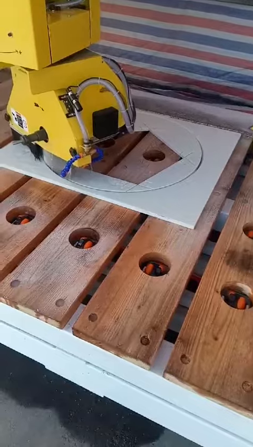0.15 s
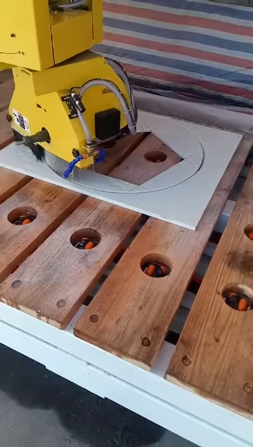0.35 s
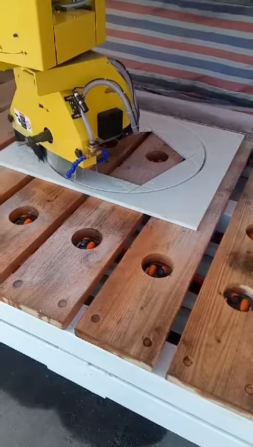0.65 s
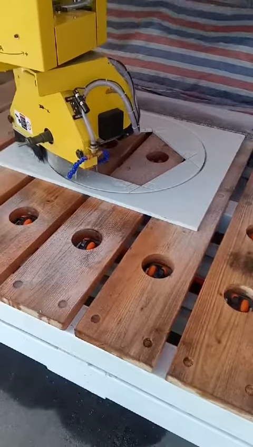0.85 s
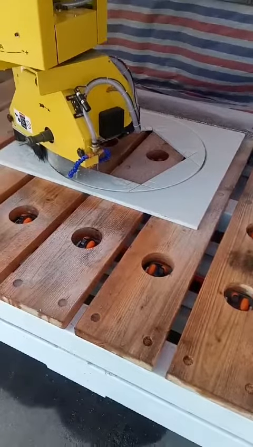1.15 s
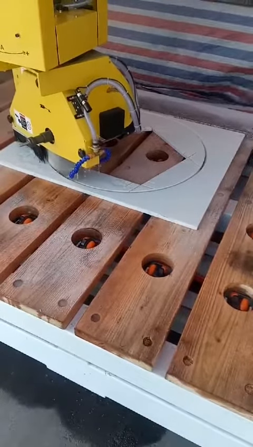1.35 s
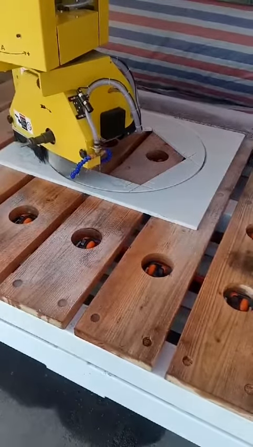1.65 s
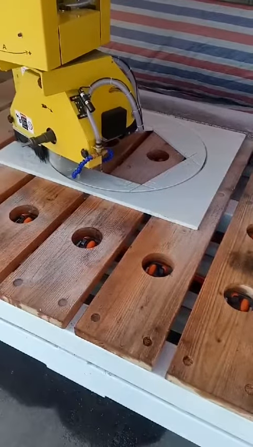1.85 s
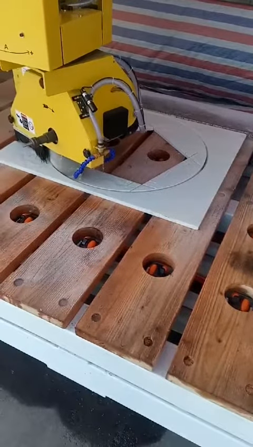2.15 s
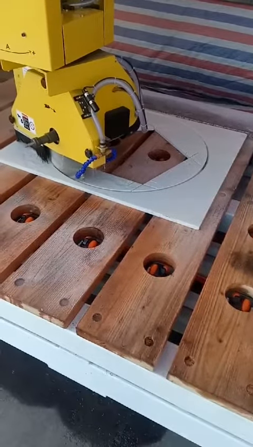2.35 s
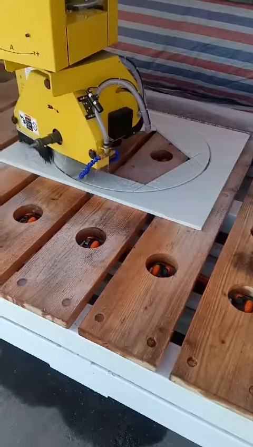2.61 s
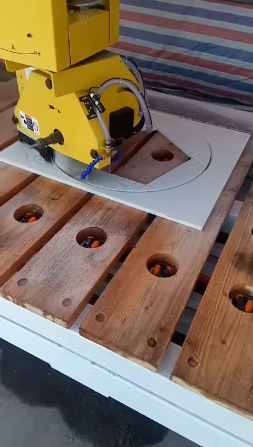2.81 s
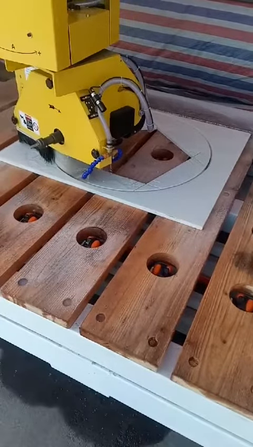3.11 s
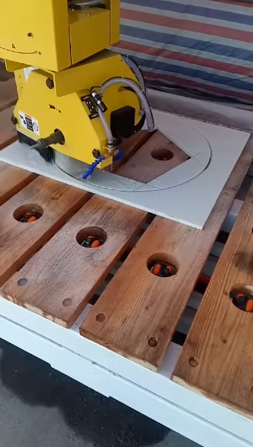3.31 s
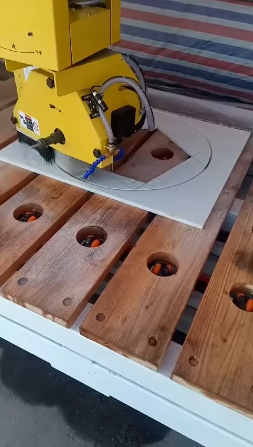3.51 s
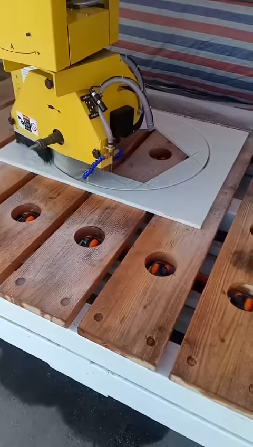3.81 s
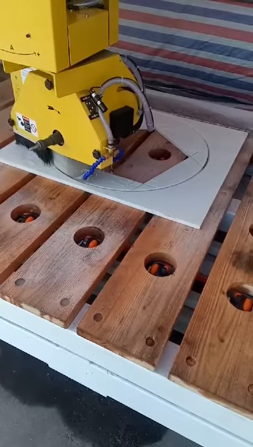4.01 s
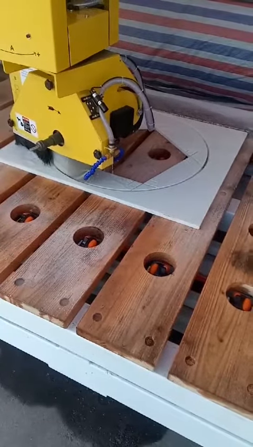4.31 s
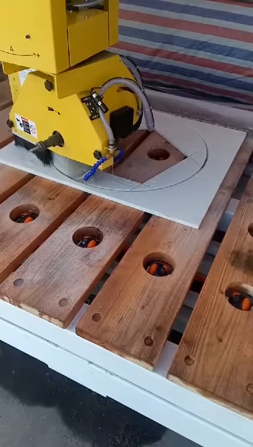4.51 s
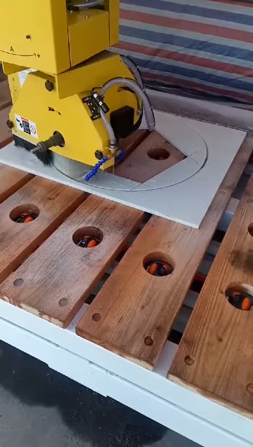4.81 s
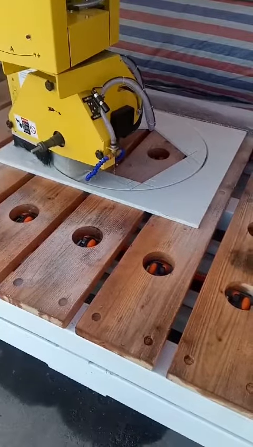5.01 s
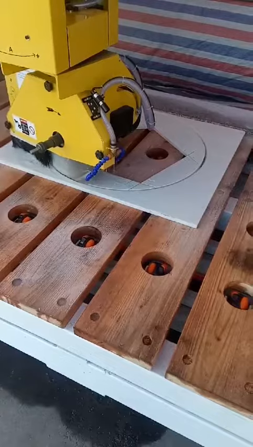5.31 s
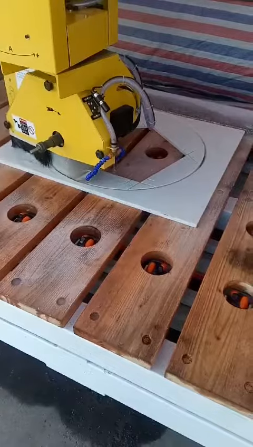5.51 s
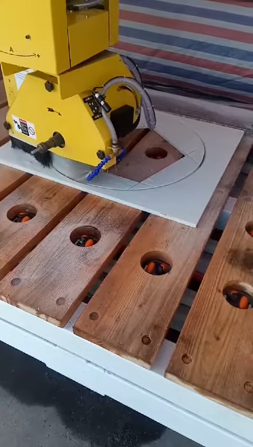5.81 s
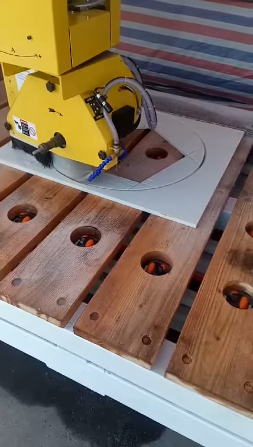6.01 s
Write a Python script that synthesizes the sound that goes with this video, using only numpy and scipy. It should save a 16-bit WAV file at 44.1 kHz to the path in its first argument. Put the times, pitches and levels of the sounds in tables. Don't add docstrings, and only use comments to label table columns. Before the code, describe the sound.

For about six seconds a water-cooled diamond blade cuts stone, starting at full force and never changing speed. The sound is a loud, dense, metallic whine, strongest at roughly two to four and a half kilohertz, made of many steady tones that beat together with a fast buzz of about fifty pulses a second. Loose grit makes the steel disc ring roughly, with a broad grinding hiss. From 0 to 2 s several piercing tones share the front; around 3 to 4 s a ringing tone near two kilohertz swells. A high squeal near 4.6 s is followed by stronger whining around 5 to 6 s. Airy water spray grows slightly throughout. Low motor hum and yard rumble sit far beneath, with small bed shudders, strongest near 3.3 s. Close phone microphone, dry, peaks squashed, treble slightly blurred; it ends still cutting.

```python
import sys
import numpy as np
from scipy import signal
from scipy.fft import rfft, irfft, next_fast_len
from scipy.io import wavfile
from scipy.ndimage import uniform_filter1d, minimum_filter1d, map_coordinates

SR = 44100
rng = np.random.default_rng(int(sys.argv[2]) if len(sys.argv) > 2 else 0)


def linear_from_db(decibels):
    return 10 ** (np.asarray(decibels, float) / 20)


def transcribe(u):
    v = np.clip(np.atleast_2d(u).T, -1, 1)
    q = np.round(v * 32767).astype(np.int16)
    wavfile.write(sys.argv[1], SR, q)


N = 271345
TOP_MULTIPLE = 312

# time in seconds, speed in Hz (turns per second).
SHAFT = [(0, 49.553), (6.15, 49.553)]
SWING_S = [.8, 3.1, 5.4]


def unit(x):
    return x / np.sqrt(np.mean(np.abs(x) ** 2) + 1e-20)


def along(points, hz):
    f, value = np.transpose(points)
    return np.interp(np.log(hz + 1), np.log(f + 1), value)


def curves(rows, t):
    s, *columns = np.transpose(rows)
    return [np.interp(t, s, column) for column in columns]


def wobble(knots_per_s):
    return map_coordinates(rng.standard_normal(400), [np.arange(N) * knots_per_s / SR])


def filtered(x, response):
    size = next_fast_len(N + 8192)
    spectrum = rfft(x, size) * response(np.fft.rfftfreq(size, 1 / SR))
    return irfft(spectrum, size)[..., :N]


def noise(spectrum):
    return unit(filtered(rng.standard_normal(N), lambda f: linear_from_db(along(spectrum, f))))


def drift(count, turns):
    z = rng.standard_normal((2, count, TOP_MULTIPLE))
    for _ in range(2):
        z = uniform_filter1d(z, max(round(turns), 1), axis=1)
    return unit(z[0] + 1j * z[1])


def bite(angle):
    # frequency in Hz, level in dB each.
    comb = [(50, -52), (1500, -48), (2500, -43), (4500, -42), (5500, -47.5), (6600, -46), (7600, -49.5),
            (8600, -55), (11000, -60), (12500, -67), (15000, -72)]
    # shaft multiple, level in dB facing, halfway, swung away.
    hum = [(1, -63.9, -55.9, -50.9), (2, -57.9, -55.9, -51.9), (3, -47.9, -48.9, -51.9),
           (4, -47.9, -48.9, -48.9), (5, -49.9, -47.9, -48.9), (6, -38.9, -35.9, -34.9),
           (7, -44.9, -37.9, -39.9), (8, -28.9, -28.9, -28.9), (9, -38.9, -37.9, -40.9),
           (10, -39.9, -42.9, -40.9), (11, -30.9, -36.9, -43.9), (12, -43.9, -42.9, -44.9),
           (13, -42.9, -45.9, -52.9), (14, -39.9, -44.9, -45.9), (15, -40.9, -37.9, -40.9),
           (16, -38.9, -40.9, -48.9), (17, -45.9, -48.9, -46.9), (18, -39.9, -37.9, -38.9),
           (19, -46.9, -45.9, -43.9), (20, -35.9, -33.9, -32.9), (21, -36.9, -40.9, -43.9),
           (22, -33.9, -33.9, -32.9), (23, -45.9, -42.9, -53.9), (24, -45.9, -43.9, -40.9),
           (25, -33.9, -35.9, -36.9), (26, -42.9, -36.9, -32.9), (27, -39.9, -37.9, -34.9),
           (28, -31.9, -35.9, -41.9), (29, -35.9, -39.9, -38.9), (30, -37.9, -44.9, -49.9)]
    # shaft multiple, level in dB facing,
    # halfway, swung away.
    disc_tones = [(32, -30.9, -32.9, -32.9), (33, -45.9, -39.9, -31.9), (34, -43.9, -40.9, -38.9),
                  (35, -25.9, -24.9, -24.9), (36, -32.9, -35.9, -33.9), (37, -25.9, -29.9, -39.9),
                  (40, -34.9, -36.9, -30.9), (41, -27.9, -26.9, -21.9), (42, -26.9, -29.9, -33.9),
                  (43, -23.9, -29.9, -31.9), (44, -30.9, -29.9, -31.9), (45, -32.9, -29.9, -32.9),
                  (46, -33.9, -33.9, -38.9), (47, -34.9, -31.9, -31.9), (48, -30.9, -28.9, -26.9),
                  (49, -37.9, -42.9, -39.9), (50, -30.9, -29.9, -30.9), (51, -40.9, -38.9, -39.9),
                  (52, -43.9, -35.9, -34.9), (53, -21.9, -22.9, -21.9), (54, -23.9, -29.9, -35.9),
                  (55, -21.9, -26.9, -30.9), (56, -32.9, -27.9, -28.9), (57, -36.9, -29.9, -30.9),
                  (58, -37.9, -32.9, -32.9), (59, -35.9, -32.9, -28.9), (60, -22.9, -31.9, -32.9),
                  (61, -29.9, -25.9, -23.9), (62, -21.9, -25.9, -30.9), (63, -36.9, -38.9, -32.9),
                  (64, -35.9, -40.9, -31.9), (65, -38.9, -32.9, -33.9), (66, -27.9, -25.9, -29.9),
             (67, -25.9, -28.9, -27.9), (68, -22.9, -25.9, -23.9), (69, -30.9, -27.9, -32.9),
             (70, -29.9, -34.9, -32.9), (71, -29.9, -33.9, -32.9), (72, -28.9, -30.9, -36.9),
             (73, -29.9, -36.9, -29.9), (74, -28.9, -32.9, -30.9), (76, -25.9, -26.9, -31.9),
             (77, -27.9, -30.9, -29.9), (78, -22.9, -26.9, -30.9), (79, -32.9, -25.9, -23.9),
             (80, -33.9, -29.9, -29.9), (81, -34.9, -37.9, -36.9), (82, -41.9, -34.9, -38.9),
             (83, -25.9, -28.9, -28.9), (85, -25.9, -23.9, -23.9), (86, -24.9, -25.9, -27.9),
             (87, -29.9, -29.9, -27.9), (88, -32.9, -34.9, -31.9), (89, -32.9, -42.9, -36.9),
             (90, -35.9, -36.9, -33.9), (91, -35.9, -40.9, -38.9), (92, -31.9, -37.9, -39.9),
             (93, -31.9, -27.9, -31.9), (94, -36.9, -34.9, -38.9), (96, -35.9, -35.9, -29.9),
                  (99, -34, -33, -36), (100, -38, -32, -40), (110, -36, -43, -43), (117, -43, -39, -42),
            (120, -38, -37, -47), (123, -39, -39, -38), (127, -41, -40, -42), (128, -39, -41, -40),
            (129, -42, -41, -38), (130, -38, -33, -37), (131, -40, -43, -44), (132, -38, -36, -37),
            (133, -37, -41, -40), (134, -44, -37, -38), (135, -41, -40, -35), (136, -38, -39, -42),
            (144, -38, -42, -48), (146, -43, -47, -49), (147, -43, -44, -51), (149, -42, -46, -44),
            (151, -43, -47, -49), (159, -46, -46, -45), (160, -51, -43, -43), (161, -55, -52, -42),
            (184, -51, -48, -56), (202, -57, -52, -50), (203, -52, -49, -54), (204, -49, -52, -58),
            (209, -57, -51, -53), (217, -55, -50, -53)]
    # time in seconds, half length in seconds, multiple, extra dB.
    squeals = [
        (4.58, .25, 96, 9),
        (5.7, .25, 86, 4),
        (5.7, .25, 87, 4),
        (.6, .6, 54, -2.5),
        (.5, .5, 55, -2),
        (5.6, .3, 96, -5),
        (4.3, .5, 53, -6),
        (5.65, .4, 53, 2),
        (5.7, .35, 33, 4),
        (3.2, .4, 130, 2),
    ]
    # shaft multiple, time on axis
    # in seconds, level on axis in dB, fall-off in dB per s^2.
    beams = [(38, 3.6, -18.5, 1.4), (39, .8, -23, 3), (39, 3.5, -16, 2), (39, 5.35, -12, 12),
             (75, .5, -22, 8), (75, 3.1, -20.5, 2.5), (75, 5, -15, 8), (75, 6, -16, 20), (84, .25, -26, 30),
             (84, 2.3, -21, 10), (84, 3.9, -18.5, 3), (84, 5.8, -18, 10)]

    count = int(angle[-1]) + 3
    seconds = np.interp(np.arange(count), angle, np.arange(N) / SR)
    multiple = np.arange(1, TOP_MULTIPLE + 1)
    weak_db = along(comb, multiple * SHAFT[0][1]) + 3 * rng.standard_normal(TOP_MULTIPLE)
    db = np.tile(weak_db, (count, 1))
    for k, *swing_db in hum + disc_tones:
        db[:, int(k) - 1] = np.interp(seconds, SWING_S, swing_db)
    for s, half_s, k, extra_db in squeals:
        db[:, k - 1] += extra_db * np.exp(-((seconds - s) / half_s) ** 2)

    loose = np.clip(.14 + .17 * np.log(multiple / 12), .1, .95)
    slow = drift(count, turns=25)
    quick = drift(count, turns=5)
    for k in {int(beam[0]) for beam in beams}:
        power = 0
        for j, s, axis_db, fall_db in beams:
            if int(j) == k:
                power = power + linear_from_db(2 * (axis_db - fall_db * (seconds - s) ** 2))
        db[:, k - 1] = 10 * np.log10(power + 1e-12)
        loose[k - 1] = .1
    shape = np.sqrt(1 - loose ** 2) + loose * slow + .2 * quick

    arbor = 1 + .12 * np.sin(2 * np.pi * 12.4 * seconds) + .1 * np.sin(2 * np.pi * 7.6 * seconds)
    shape = shape * arbor[:, None]
    scatter_rad = np.interp(multiple, [12, 16, 33, 36, 44, 52], [1.0, 2.2, 2.2, .7, .7, 4])
    lines = linear_from_db(db) * shape * np.exp(1j * scatter_rad * rng.standard_normal(TOP_MULTIPLE))

    points = 4096
    padded = np.pad(lines, ((0, 0), (1, points // 2 - TOP_MULTIPLE)))
    turns = irfft(padded, points) * points / np.sqrt(2)
    turns = np.hstack([turns, turns[:, :1]])
    return map_coordinates(turns, [angle, angle % 1 * points], order=1)


def grit(angle):
    # frequency in Hz, width in Hz, level in dB facing, level in dB swung away.
    modes = [(1700, 120, -16, -14), (1950, 70, -7, -7), (2100, 100, -12, -9), (2400, 100, -17, -14),
             (2650, 70, -8, -8), (2950, 50, -8, -12), (3050, 50, -4, -11), (3300, 70, -4, -3.5),
             (3700, 80, -1, 1), (3850, 80, -10, -4), (4200, 110, -3, -5), (4450, 70, -9, -12),
             (4620, 100, -8, -10), (4900, 80, -13, -16), (5100, 90, -17, -17), (5430, 90, -17, -19),
             (6050, 100, -17, -19), (6500, 300, -15, -15.5), (6700, 70, -15, -17), (7100, 120, -20, -23),
             (7500, 90, -16, -18), (8500, 200, -24, -24), (10100, 500, -25, -25)]
    # frequency in Hz, level in dB per Hz.
    grind = [(100, -33), (300, -24), (650, -25), (900, -21), (1500, -20), (2400, -19), (3900, -12),
             (5600, -26), (7000, -21.5), (8000, -25), (9500, -30), (12000, -38), (16000, -50)]

    runout = unit(linear_from_db(1.5 * np.cos(2 * np.pi * angle) + 1.1 * np.cos(4 * np.pi * angle + 1.3)))
    blows = runout * rng.standard_normal(N)
    hz = np.arange(0, SR / 2, 4.)

    def rung(level_column):
        power = 0
        for mode in modes:
            peak = 1 / (1 + (2 * (hz - mode[0]) / mode[1]) ** 2) ** 1.4
            power = power + linear_from_db(2 * mode[level_column]) * peak
        return filtered(blows, lambda f: np.interp(f, hz, np.sqrt(power)))

    away = np.interp(np.arange(N) / SR, SWING_S, [0, .5, 1])
    ring = (1 - away) * rung(2) + away * rung(3)
    hiss = filtered(rng.standard_normal(N), lambda f: linear_from_db(along(grind, f)))
    return linear_from_db(3.2 + 1.3 * wobble(13)) * ring + linear_from_db(.5 * wobble(3)) * hiss


def spray(angle):
    # frequency in Hz, level in dB per Hz.
    water = [(5000, -35), (8000, -5), (9000, -1), (10300, 0), (11500, -3.5), (13000, -8), (15400, -7),
             (15600, -40)]
    start_db, growth_db_per_s = -37.5, .35
    gusts = linear_from_db(1.5 * wobble(14) + 1.2 * wobble(40) + 1.2 * np.cos(2 * np.pi * angle))
    level_db = start_db + growth_db_per_s * np.arange(N) / SR
    return linear_from_db(level_db) * unit(gusts * noise(water))


def rumble():
    # frequency in Hz, level in dB per Hz.
    yard = [(15, -34), (35, -19), (50, -5), (80, -6), (150, -5), (215, 5), (300, -10), (600, -40)]
    # time in seconds, level in dB over calm.
    shudders = [
        (.55, 7),
        (1.17, 9),
        (2.38, 6),
        (2.9, 10),
        (3.27, 13),
        (4.4, 9),
        (4.64, 9),
        (5.05, 6),
        (5.58, 7),
        (5.86, 8),
    ]
    calm_db, calm_db_per_s, shudder_s = -55, 1.1, .07
    pump_hz, pump_width_hz, pump_db = 218, 8, -48

    t = np.arange(N) / SR
    bed_db = calm_db + calm_db_per_s * t
    for s, db in shudders:
        bed_db = bed_db + db * np.exp(-((t - s) / shudder_s) ** 2)
    bed = linear_from_db(bed_db + 2.6 * wobble(5)) * noise(yard)
    pump = filtered(rng.standard_normal(N), lambda f: 1 / (1 + (2 * (f - pump_hz) / pump_width_hz) ** 2))
    return bed + linear_from_db(pump_db) * unit(pump)


def scene():
    angle = np.cumsum(curves(SHAFT, np.arange(N) / SR)[0]) / SR
    saw = linear_from_db(1.7) * bite(angle) + grit(angle) + spray(angle) + rumble()
    return np.array([saw, saw])


def scramble_treble(x):
    # time in seconds, share 0-1.
    share_by_time = [(0, .5), (.6, .3), (1.4, 1), (2.6, 1.1), (3.5, .9), (4.5, .7), (5, .4), (6.15, .35)]
    # frequency in Hz, share 0-1.
    share_by_hz = [(7900, 0), (8600, .03), (9300, .13), (10000, .17), (11400, .11), (13400, .06),
                   (15200, 0)]
    hop, offset, flipped_share = 1024, 1005, .22

    bins = np.arange(352, 736)
    hz = bins * SR / (2 * hop)
    sample = np.arange(2 * hop)
    window = np.sin(np.pi * (sample + .5) / (2 * hop))
    basis = window[:, None] * np.cos(np.pi / hop * np.outer(sample + (hop + 1) / 2, bins + .5))
    starts = np.arange(offset, N - 2 * hop, hop)
    index = starts[:, None] + sample
    centre_s = (starts + hop) / SR

    dice = np.repeat(rng.random((len(starts), 12)), 32, axis=1)
    band_hz = np.repeat(hz[16::32], 32)
    odds = np.outer(curves(share_by_time, centre_s)[0], along(share_by_hz, band_hz))
    swap = dice < odds
    sign = np.where(swap, rng.choice([-1., 1.], swap.shape), 1.)
    sign[dice < flipped_share * odds] = -1
    jump_db = np.outer(rng.standard_normal(len(starts)), np.interp(hz, [10500, 12500], [1.0, 2.3]))
    jump = linear_from_db(jump_db)

    lines = x[0][index] @ basis
    changes = []
    for gain in (jump, jump * sign):
        frames = (lines * (gain - 1)) @ basis.T * 2 / hop
        changes.append(np.bincount(index.ravel(), frames.ravel(), N))
    return x + changes


def band_limit(x):
    return signal.sosfilt(signal.butter(12, 15650, fs=SR, output="sos"), x)


def record(dry):
    need = np.minimum(1, .95 / (np.abs(dry) + 1e-9))
    held = minimum_filter1d(need, size=129, axis=1)
    gain = uniform_filter1d(held, size=129, axis=1)
    x = linear_from_db(.4) * dry * gain ** .6
    x = x / (1 + np.abs(x / .955) ** 6) ** (1 / 6)
    mix = filtered(scramble_treble(x), lambda f: f < 15530)
    return band_limit(mix)


dry = scene()
out = record(dry)
transcribe(out)
```